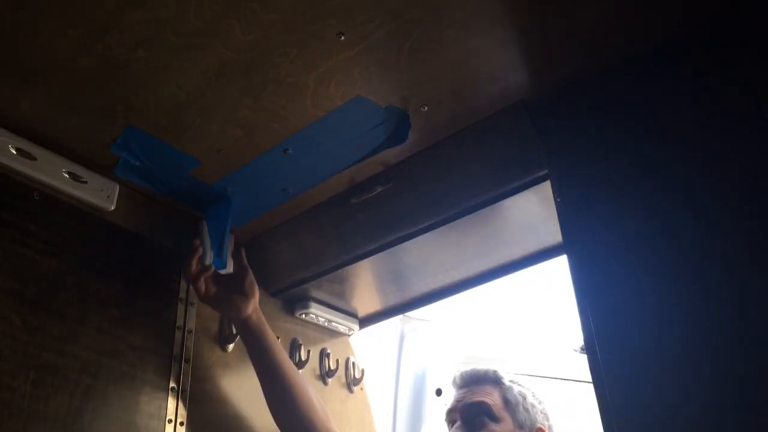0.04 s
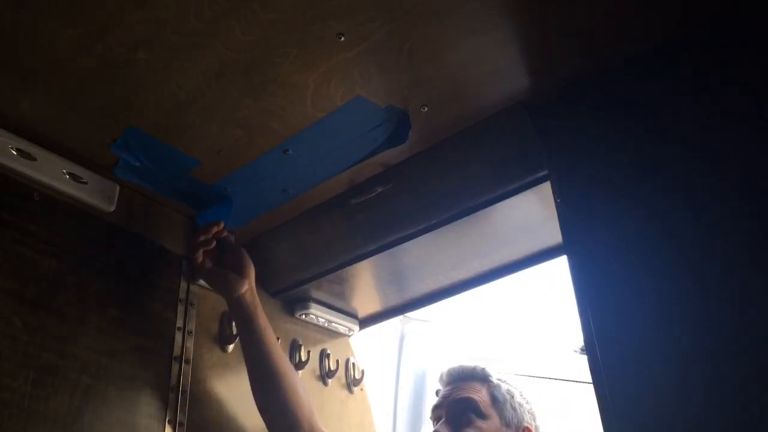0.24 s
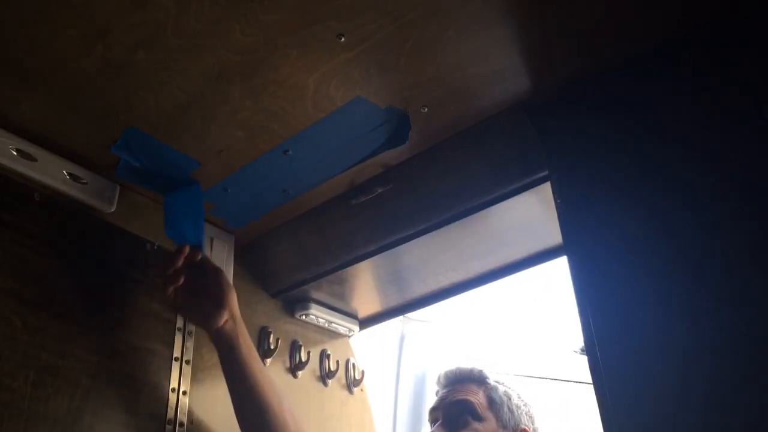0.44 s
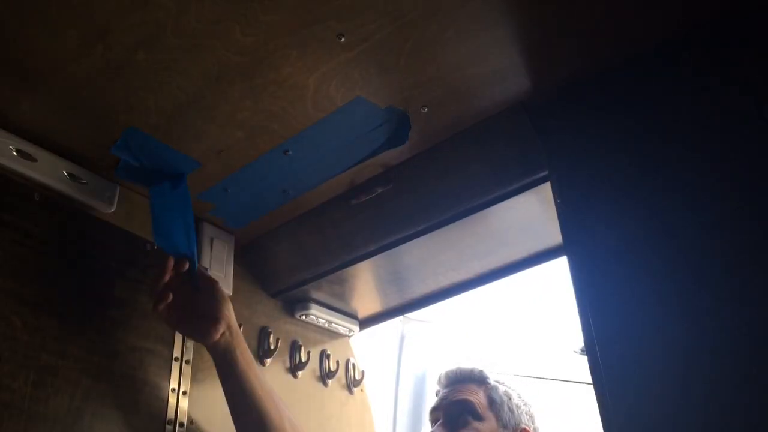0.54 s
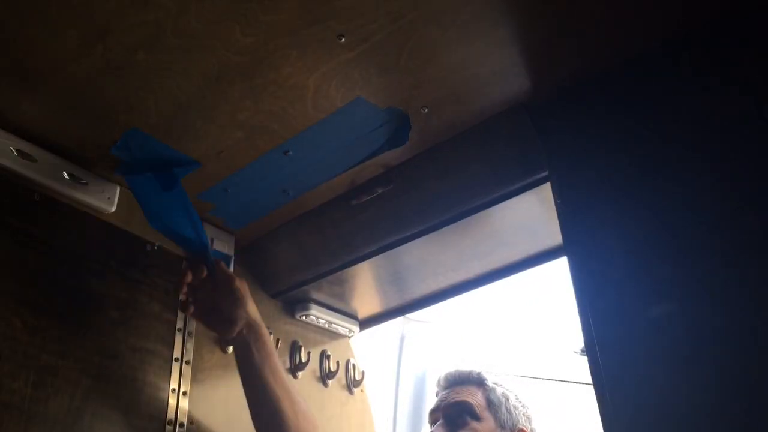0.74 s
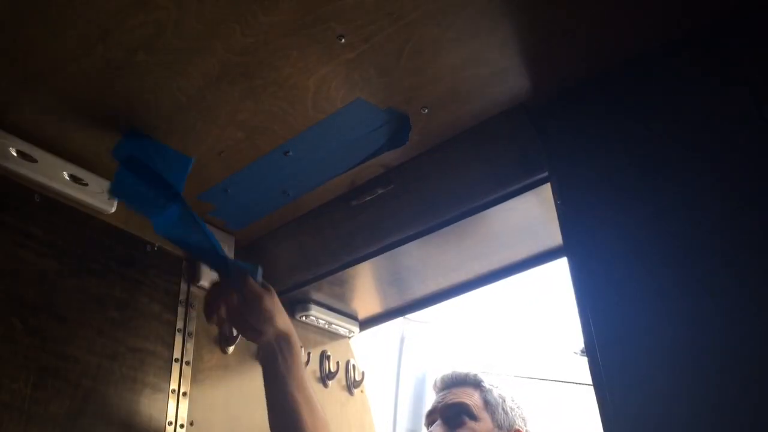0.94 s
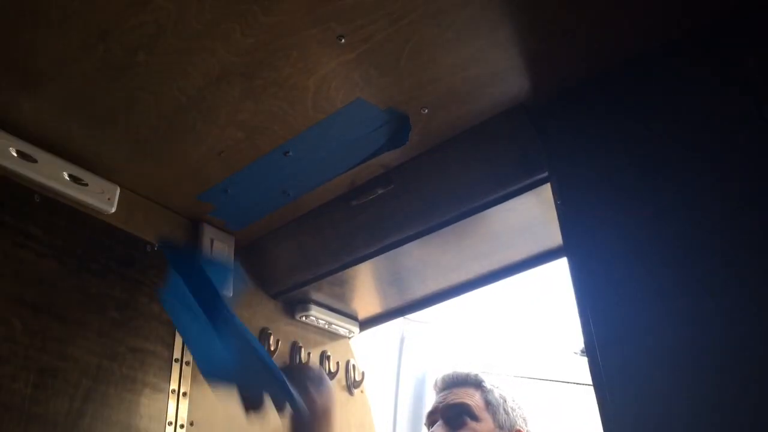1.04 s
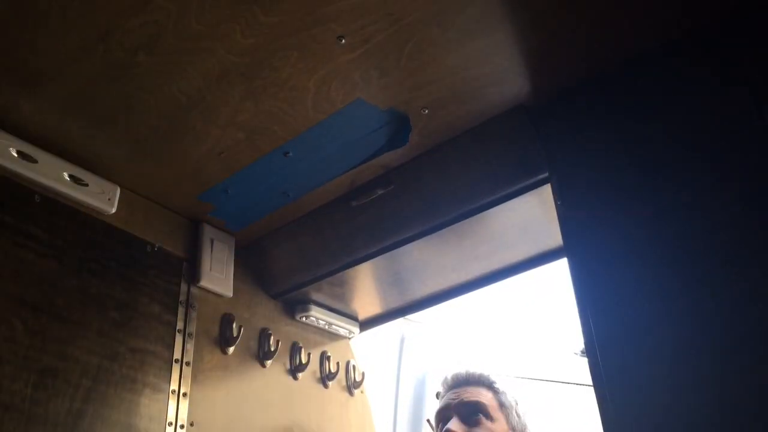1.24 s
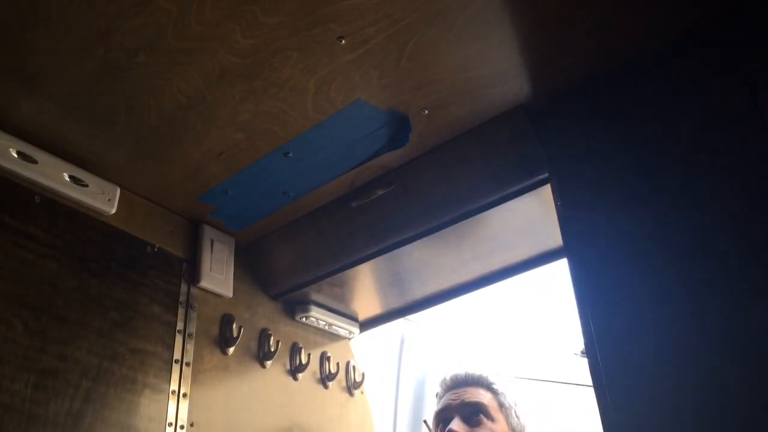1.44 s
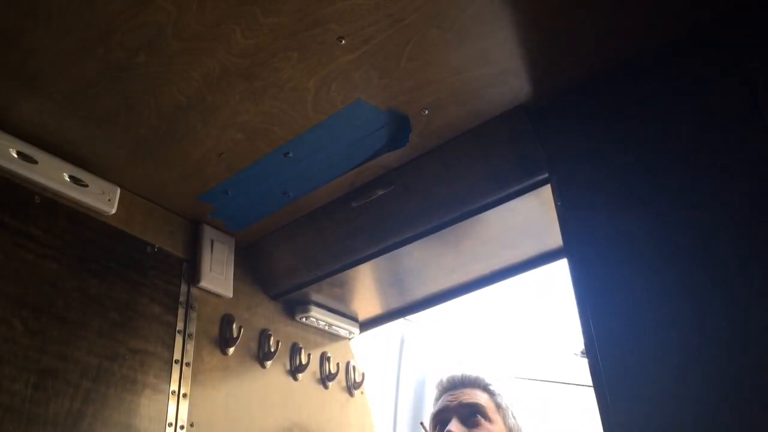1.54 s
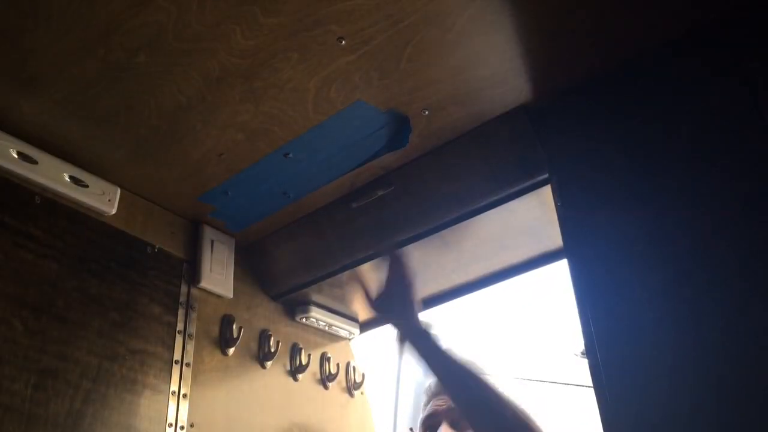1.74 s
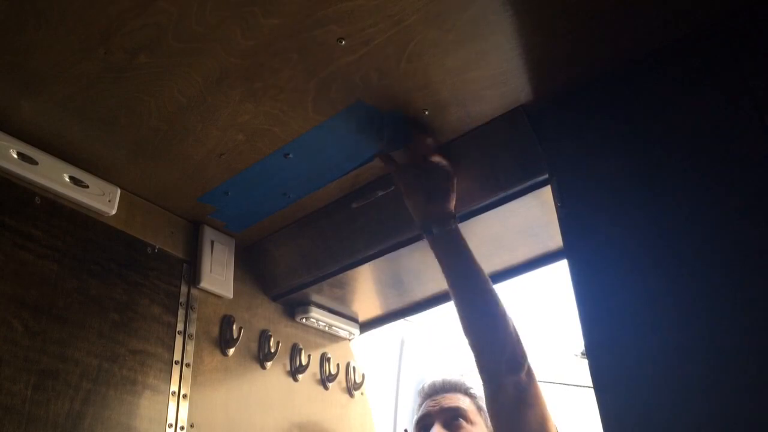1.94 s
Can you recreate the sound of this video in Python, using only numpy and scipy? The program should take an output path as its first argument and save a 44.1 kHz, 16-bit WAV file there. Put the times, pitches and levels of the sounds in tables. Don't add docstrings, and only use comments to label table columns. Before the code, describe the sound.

Tape ripped from thin wood with a raspy hiss and knocks, then crackly crumpling in a small van

```python
import sys
import numpy as np
from scipy import signal
from scipy.io import wavfile
from scipy.ndimage import uniform_filter1d

SR = 44100
rng = np.random.default_rng(int(sys.argv[2]) if len(sys.argv) > 2 else 0)


def materialize(psi):
    bounded = np.clip(np.atleast_2d(psi).T, -1, 1)
    quanta = np.round(bounded * 32767).astype(np.int16)
    wavfile.write(sys.argv[1], SR, quanta)


def boost_factor(decibels):
    exponent = np.asarray(decibels, float) / 20
    return 10 ** exponent


N = 88200

# (frequency [Hz], width [Hz], level [dB])
PANEL_MODES = [(94, 21, -12), (158, 61, -11), (196.7, 29.5, 2), (253.3, 43, -3.5), (348, 61, -4),
               (411.8, 48, 5.5), (590, 84, -6.5), (1270, 60, -24)]


def peel():
    # (time [s], effort [dB], panel coupling [dB])
    pulls = [
        [(.3335, -31, -25), (.35, -38.5, -5), (.40, -40.5, 1.5), (.46, -36, -6), (.59, -33, 1),
         (.62, -39, -1.5), (.70, -42, -1.5), (.77, -42.5, -7), (.86, -52.5, -11)],
        [(.86, -52.5, -9), (.93, -41.5, -7), (.985, -33.5, -2), (1.015, -26.5, -5.5), (1.045, -31, 4),
         (1.078, -26.5, -12), (1.09, -46, -1), (1.11, -56, -2), (1.14, -62, 6)],
    ]
    # (frequency [Hz], level [dB per Hz])
    tape_spectrum = [(290, -30.5), (500, -6.5), (647, -14.5), (874, -8.5), (1040, -7), (2090, -3),
                     (5700, -8.5), (10400, -9), (15300, -13.5)]
    gain, coupling_db = control(pulls)
    slips = clicks(per_s=11000, spread_db=4.5, clump_db=0.64, clump_s=0.005)
    hiss = evened(colour(slips, tape_spectrum))
    drum = panel(clicks(per_s=3500, spread_db=2.1, clump_db=1.2, clump_s=0.022), PANEL_MODES)
    drum = evened(signal.sosfilt(signal.butter(N=2, Wn=410, fs=SR, output="sos"), drum))
    return gain * (hiss + boost_factor(coupling_db) * drum)


def crumple():
    # (time [s], effort [dB], dullness [0-1])
    crushes = [
        [(.196, -76, 0.1), (.208, -69, 0.2), (.212, -51, 1), (.22, -56, 0.4)],
        [(.245, -55, .1), (.27, -49.5, 0.3), (.30, -57, 0.2), (.331, -79, 0.1)],
        [(1.11, -46, 0.5), (1.14, -45.5, 0), (1.17, -50, 0.23), (1.195, -39, 0.06), (1.225, -36, 0),
         (1.245, -39, 1), (1.265, -59, 0), (1.30, -61, 0.5)],
        [(1.30, -55.5, 0.2), (1.397, -60, 0.97), (1.40, -43, 0.3), (1.407, -33, 0.24), (1.48, -35, 0.43),
         (1.55, -34, 0.11), (1.58, -39.5, 0.52), (1.64, -45, 0.95)],
        [(1.64, -43, 0.7), (1.675, -41, 0.06), (1.695, -30, 0.15), (1.725, -47.5, 0.53), (1.76, -58, 0.8),
         (1.82, -56, 1)],
        [(1.82, -62, 1), (1.87, -54.5, 0.2), (1.93, -52.5, 0.43), (1.97, -56.5, 0.67), (2.0, -52, 0.5)],
    ]
    # (frequency [Hz], level [dB per Hz])
    open_hand = [(290, -59), (500, -41), (1870, -22.5), (2060, -8.5), (2910, -1.5), (3820, -4), (10900, -7),
                 (15300, -14.5)]
    # (frequency [Hz], level [dB per Hz])
    closed_fist = [(290, -55), (500, -9), (611, -9), (1110, -4.5), (1420, 1.5), (3550, -3.5), (7370, -6.5),
                   (15300, -16)]
    fist_hz, fist_width_hz, fist_db, rustle_db = 1550, 310, -6.5, -20
    gain, dull = control(crushes)
    dull = np.clip(dull, 0, 1)
    creases = clicks(per_s=5000, spread_db=2.5, clump_db=1.9, clump_s=0.0022)
    bright_part = np.sqrt(1 - dull) * evened(colour(creases, open_hand))
    dull_part = np.sqrt(dull) * evened(colour(creases[::-1], closed_fist))
    pocket = evened(resonate_twice(creases, fist_hz, fist_width_hz))
    rustle = evened(panel(creases, PANEL_MODES[1:5]))
    return gain * (bright_part + dull_part + boost_factor(fist_db) * dull * pocket + boost_factor(rustle_db) * rustle)


def snaps():
    # (time [s], peak [dB], pitch [Hz], ring t60 [s], knock [dB])
    snap_events = [(0.1216, -41.5, 3000, 0.06, -38), (0.2158, -29, 1610, 0.13, -18),
                   (0.2213, -8, 3560, 0.017, -23.5), (0.2293, -18, 4230, 0.048, -25),
                   (0.337, -14, 1750, 0.029, -13), (0.3647, -19, 1880, 0.023, -8.5),
                   (0.7815, -17.5, 3400, 0.03, -22.5), (0.9896, -20, 2320, 0.028, -44),
                   (0.9976, -19, 2130, 0.21, -14), (1.096, -22, 2420, 0.026, -28),
                   (1.4052, -28, 2010, 0.014, -10)]
    # (frequency [Hz], width [Hz], level [dB])
    knock_modes = [(232, 55, -3), (392, 81, 2.5), (617, 120, -4.5)]
    knock_lag_s = 0.00194
    out, knock = np.zeros(N + 9000), np.zeros(N)
    for s, db, hz, t60, knock_db in snap_events:
        out[round(s * SR):][:9000] += boost_factor(db - 5.5) * snap(hz, t60, ring_db=0, low_hz=800)
        knock[round((s + knock_lag_s) * SR)] += boost_factor(db + knock_db + 38.0)
    contact = uniform_filter1d(knock, size=24, origin=-12)
    return out[:N] + panel(contact, knock_modes)


def cracks():
    # (time [s], peak [dB], pitch [Hz], ring t60 [s], ring strength [dB])
    crack_events = [(0.2804, -35, 3930, 0.059, 2), (0.2854, -24, 3160, 0.082, -6),
                    (1.1276, -23.5, 3300, 0.033, -2.5), (1.133, -24, 3800, 0.015, 7),
                    (1.215, -25, 4260, 0.073, -3), (1.2354, -15, 3160, 0.044, -5.5),
                    (1.28, -41, 4660, 0.055, -3), (1.305, -35, 4100, 0.021, 9),
                    (1.3198, -20.5, 4320, 0.024, -0.5), (1.3598, -29, 2540, 0.043, 0),
                    (1.4689, -24, 2670, 0.11, -14), (1.4945, -17.5, 4480, 0.02, 3),
                    (1.517, -24, 4100, 0.03, 0), (1.5431, -13.5, 1550, 0.028, 0.5),
                    (1.5473, -21, 1610, 0.015, 7), (1.5903, -29, 1730, 0.027, 7),
                    (1.6247, -28, 4200, 0.036, 10.5), (1.6474, -14.5, 1770, 0.038, 0.5),
                    (1.6539, -23, 1400, 0.016, -9), (1.682, -6, 1830, 0.029, -16),
                    (1.689, -17.5, 1600, 0.039, 6.5), (1.7119, -19, 1900, 0.017, 2),
                    (1.7408, -26.5, 1810, 0.022, 8), (1.8616, -35, 2090, 0.063, -26)]
    out = np.zeros(N + 9000)
    for s, db, hz, t60, ring_db in crack_events:
        out[round(s * SR):][:9000] += boost_factor(db - 7.0) * snap(hz, t60, ring_db, low_hz=1100)
    return out[:N]


def snap(hz, t60, ring_db, low_hz):
    # (frequency [Hz], level [dB per Hz])
    snap_spectrum = [(290, 6), (500, -10.5), (994, -3), (1690, 8), (5080, -8.5), (6390, 3.5), (13300, -11),
                     (15300, -26)]
    tick_db, tick_t60_s, fray_db, fray_q, base_ring_db, ring_q = 4.5, 0.0043, -6, 0.43, -5, 2.8
    t = np.arange(9000) / SR
    noise = rng.standard_normal((3, 9000))
    rise = np.minimum(t / .0012, 1)
    fall = boost_factor(-60 * t / max(t60, .005)) * rise
    tick = boost_factor(tick_db - 60 * t / tick_t60_s) * rise * noise[0]
    pitched = evened(resonate(noise[2], hz, hz / fray_q))
    fray = evened(colour(noise[2], snap_spectrum) + 1.5 * pitched)
    ring = evened(resonate_twice(noise[1], hz, hz / ring_q))
    body = fall * (boost_factor(fray_db) * fray + boost_factor(base_ring_db + ring_db) * ring)
    return above(colour(tick, snap_spectrum) + body, low_hz)


def ticks():
    # (time [s], peak [dB], pitch [Hz])
    tick_events = [(0.2219, -6.5, 5800), (0.561, -20, 9400), (.5827, -24, 7400), (0.6265, -17, 6850),
                   (0.7805, -19, 6150), (0.9014, -28.5, 7100), (1.0053, -9, 8500), (1.016, -15, 8060),
                   (1.036, -34, 8600), (1.446, -17.5, 7100), (1.563, -22.5, 7000), (1.592, -22.5, 10000)]
    q, t60_s, rise_s = .9, .005, 0.00036
    out, t = np.zeros(N + 9000), np.arange(2000) / SR
    for s, db, hz in tick_events:
        noise = resonate_twice(rng.standard_normal(len(t)), hz, hz / q)
        burst = evened(above(noise, hz / 2))
        envelope = boost_factor(db - 1.0 - 60 * t / t60_s) * np.minimum(t / rise_s, 1)
        out[round(s * SR):][:len(t)] += envelope * burst
    return out[:N]


def pops():
    # (time [s], peak [dB], pitch [Hz], t60 [s])
    pop_events = [(0.286, -25.5, 3900, .008), (0.2888, -34, 3020, 0.0097), (0.3378, -32, 1870, .012),
                  (0.364, -24, 593, 0.011), (0.2216, -20.5, 1640, 0.0089), (0.3661, -27, 3640, 0.004),
                  (.56, -29, 406, 0.032), (.579, -34, 426, 0.044), (0.7812, -21, 2420, .008),
                  (0.9342, -23.5, 3180, 0.0093), (0.9909, -16, 2650, 0.0043), (0.9983, -20, 2330, 0.011),
                  (1.0145, -19.5, 2390, 0.0073), (1.0274, -22.5, 1240, 0.017), (1.0352, -19, 1400, 0.012),
                  (1.043, -22, 410, .04), (1.058, -25.5, 796, .02), (1.0735, -33, 5500, 0.0051),
                  (1.1857, -43, 4460, 0.0059), (1.236, -36, 940, 0.014), (1.2369, -30, 1720, 0.0075),
                  (1.411, -30.5, 626, 0.026), (1.4255, -34, 2600, 0.0082), (1.436, -28, 2750, .01),
                  (1.4809, -22, 4300, 0.0071), (1.5022, -27, 1500, 0.025), (1.5072, -28, 1550, 0.02),
                  (1.5278, -28, 2700, 0.008), (1.519, -21, 4200, .005), (1.5435, -20, 3400, 0.013),
                  (1.552, -21, 6500, 0.0068), (1.572, -29, 2080, 0.011), (1.574, -27.5, 1700, 0.016),
                  (1.609, -33, 2120, .015), (1.6486, -19, 1390, 0.014), (1.6531, -19.5, 1550, 0.015),
                  (1.66, -25, 1700, 0.0084), (1.685, -10.5, 2900, 0.0028), (1.6835, -23, 1520, 0.011),
                  (1.686, -12.5, 4530, 0.0046), (1.69, -23, 1820, .01), (1.692, -22, 3640, 0.0062),
                  (1.6991, -33, 1990, 0.011), (1.702, -29, 1410, 0.014), (1.7063, -38, 2500, 0.0054),
                  (1.7195, -28, 2020, 0.0087)]
    out, t = np.zeros(N + 2000), np.arange(2000) / SR
    for s, db, hz, t60 in pop_events:
        decay_s = np.clip(t60, .003, 18 / hz)
        mode = boost_factor(db - 60 * t / decay_s) * np.sin(2 * np.pi * hz * t)
        out[round(s * SR):][:len(t)] += above(mode, hz / 2)
    return out[:N]


def bumps():
    # (time [s], level [dB], pitch [Hz], t60 [s])
    thuds = [
        (0.071, -55, 45.7, 0.11),
        (0.338, -47.5, 54.6, 0.056),
        (.41, -66, 50.5, 0.076),
        (0.61, -41, 80, 0.064),
        (0.786, -46, 47.5, .1),
        (0.99, -29.5, 50.3, 0.094),
        (0.999, -32, 124, 0.058),
        (1.079, -32.5, 50, 0.11),
        (1.09, -44.5, 124, 0.074),
    ]
    drop, drop_s, rise_s = .9, .006, 0.0034
    out, t = np.zeros(N + 13000), np.arange(13000) / SR
    for s, db, hz, t60 in thuds:
        turns = np.cumsum(hz * (1 + drop * np.exp(-t / drop_s))) / SR
        envelope = boost_factor(db - 60 * (t / t60) ** 2) * np.minimum(t / rise_s, 1)
        out[round(s * SR):][:13000] += envelope * np.sin(2 * np.pi * turns)
    return out[:N]


def cabin(x):
    t60_s = .085
    t = np.arange(9000) / SR
    noise = rng.standard_normal(9000) * (rng.random(9000) < .1)
    low = signal.lfilter([.35], [1, -.65], noise)
    low_tail = low * boost_factor(-60 * t / t60_s)
    high_tail = 1.07 * (noise - low) * boost_factor(-90 * t / t60_s)
    tail = (low_tail + high_tail) * (t > .002)
    return signal.oaconvolve(x, tail / np.linalg.norm(tail))[:N]


def cabin_air():
    # (frequency [Hz], level [dB per Hz])
    air_spectrum = [(12, -23), (20, 5.5), (132, -1), (322, -11.5), (402, -11.5), (741, -16.5), (1570, -16),
                    (2310, -22.5), (15300, -30)]
    noise = colour(rng.standard_normal(N + 2048), air_spectrum)
    return boost_factor(-63) * evened(above(noise, 31)[2048:])


def control(tables):
    t, gain, other = np.arange(N) / SR, np.zeros(N), np.zeros(N)
    for table in tables:
        s, db, c = np.transpose(table)
        on = (t >= s[0]) & (t < s[-1])
        gain = gain + on * boost_factor(np.interp(t, s, db))
        other = np.where(on, np.interp(t, s, c), other)
    return uniform_filter1d(gain, size=60), other


def clicks(per_s, spread_db, clump_db, clump_s):
    when, size, sign, clump = rng.random((N, 4)).T
    clump = evened(uniform_filter1d(clump - .5, max(2, round(clump_s * SR))))
    level_db = -spread_db * np.log(size + 0.026) + clump_db * clump
    return evened((when < per_s / SR) * boost_factor(level_db) * np.sign(sign - .5))


def panel(x, modes):
    return sum(boost_factor(db) * resonate(x, hz, width) for hz, width, db in modes)


def resonate(x, hz, width):
    r = np.exp(-np.pi * width / SR)
    return 2 * signal.lfilter([1 - r], [1, -r * np.exp(2j * np.pi * hz / SR)], x).real


def resonate_twice(x, hz, width):
    return resonate(resonate(x, hz, width), hz, width)


def colour(x, points):
    f, db = np.transpose(points)
    hz = np.abs(np.fft.fftfreq(4096, 1 / SR)) + 1
    skirt_db = 20 * np.maximum(np.log2(f[0] / hz), 0)
    log = np.log(boost_factor(np.interp(np.log(hz), np.log(f), db) - skirt_db))
    taps = np.fft.ifft(np.exp(log - 1j * signal.hilbert(log).imag)).real[:2048]
    return signal.oaconvolve(x, taps / np.linalg.norm(taps))[:len(x)]


def above(x, hz):
    return signal.sosfilt(signal.butter(N=3, Wn=hz, btype="high", fs=SR, output="sos"), x)


def evened(x):
    return x / np.sqrt(np.mean(x ** 2) + 1e-20)


def scene():
    near = peel() + crumple() + snaps() + cracks() + ticks() + pops()
    tail = boost_factor(-6) * cabin(above(near, 333))
    return np.tile(boost_factor(-1.0) * (near + tail) + bumps() + cabin_air(), (2, 1))


def roll_off(x):
    return signal.sosfilt(signal.butter(12, 16530, fs=SR, output="sos"), x)


def record(dry):
    edge_hz, leak_db = 15250, -46
    low_pass = signal.firwin(401, edge_hz, window=("kaiser", 3.5), fs=SR)
    limited = signal.oaconvolve(dry, low_pass[None], "same")
    return roll_off(limited + boost_factor(leak_db) * dry)


dry = scene()
out = record(dry)
materialize(out)
```